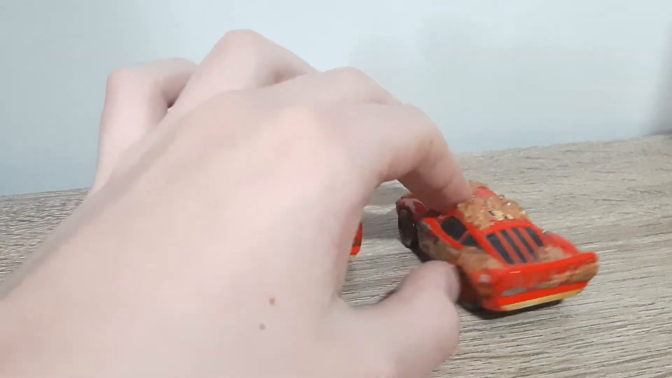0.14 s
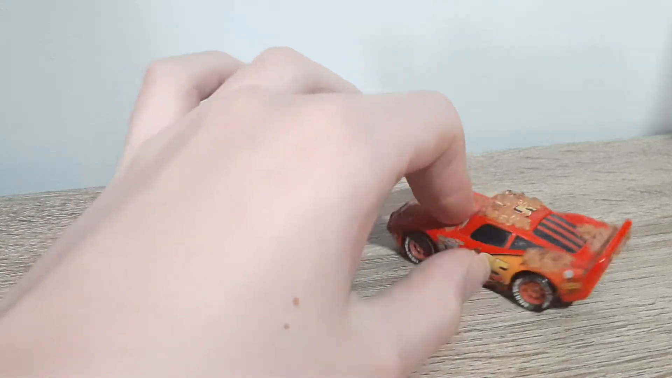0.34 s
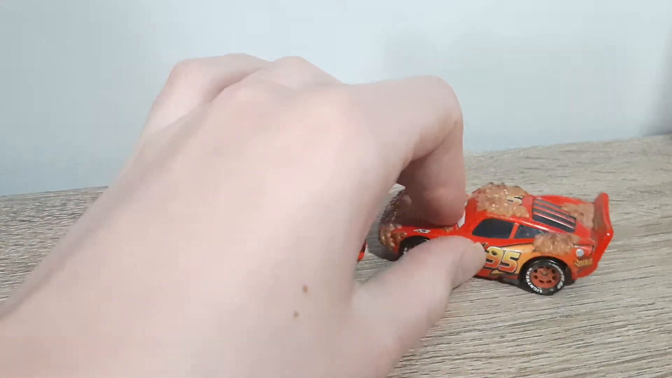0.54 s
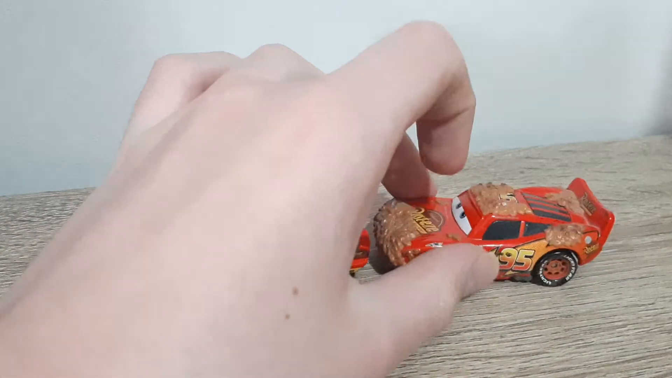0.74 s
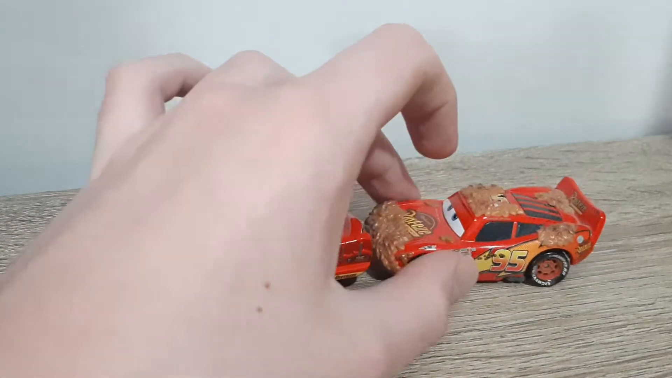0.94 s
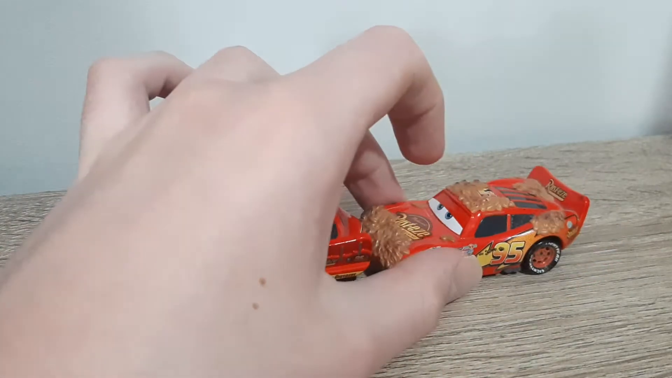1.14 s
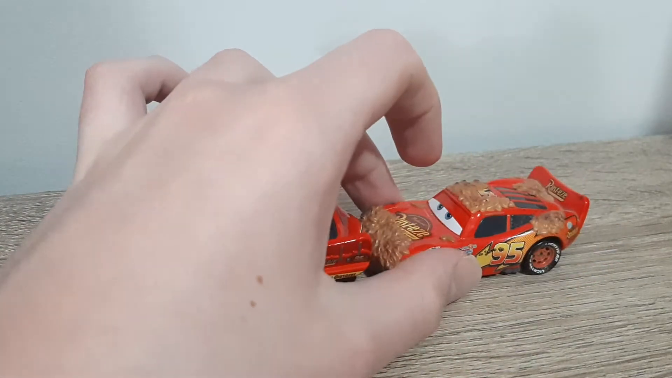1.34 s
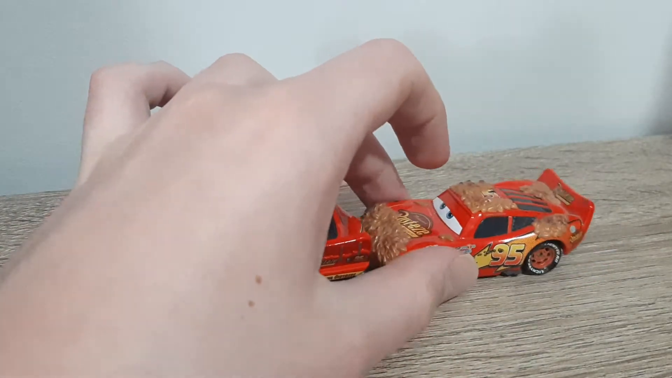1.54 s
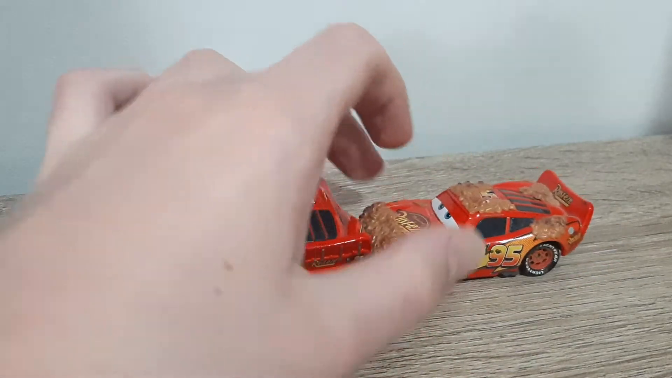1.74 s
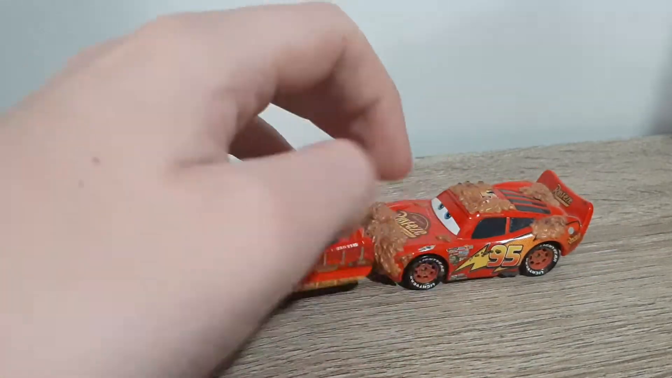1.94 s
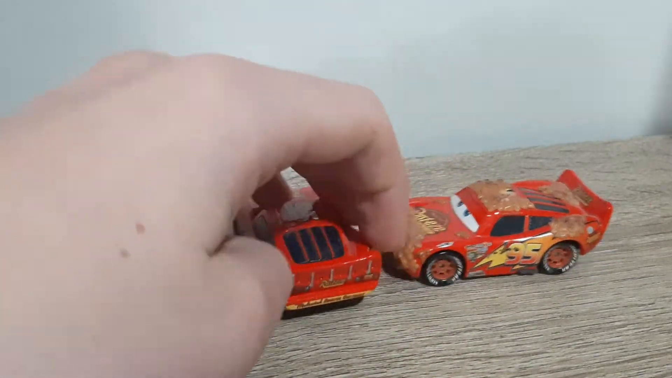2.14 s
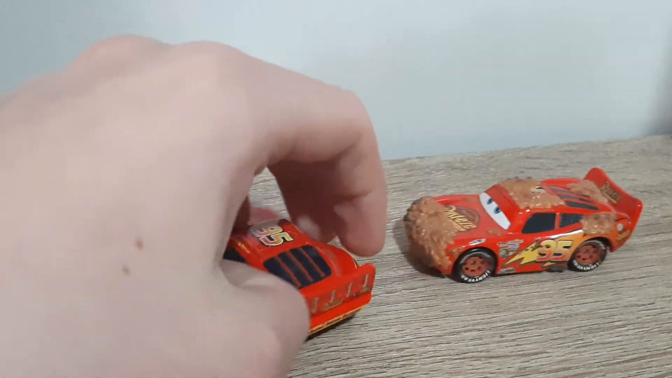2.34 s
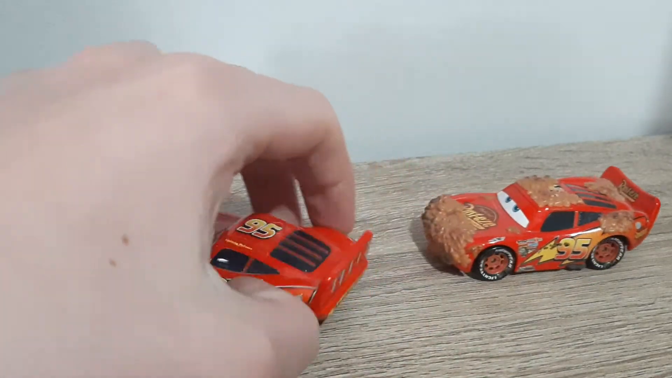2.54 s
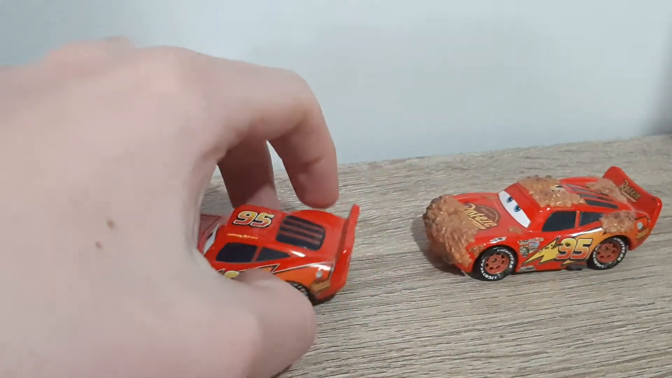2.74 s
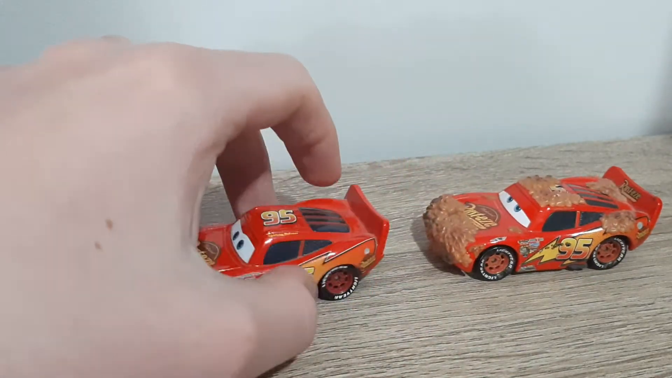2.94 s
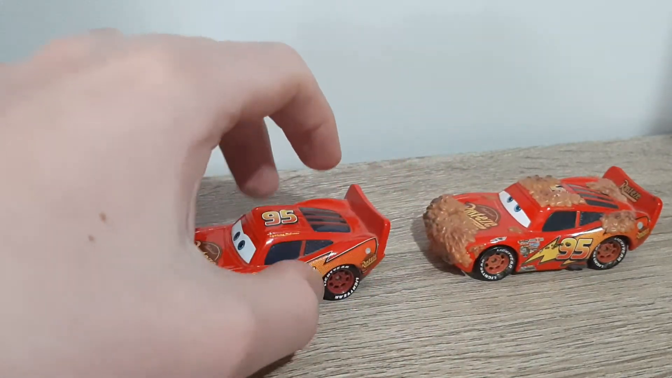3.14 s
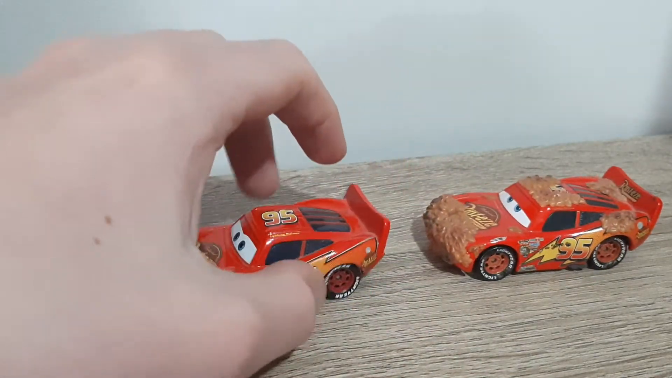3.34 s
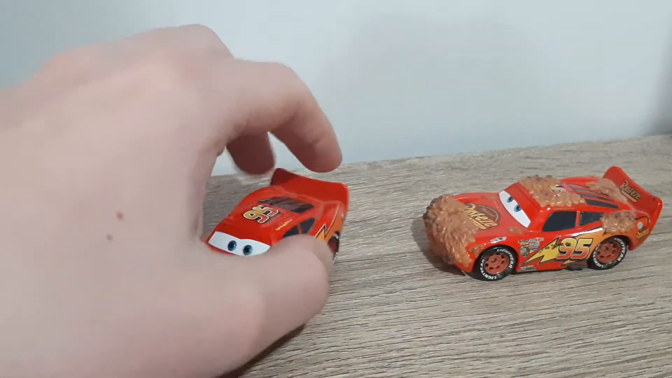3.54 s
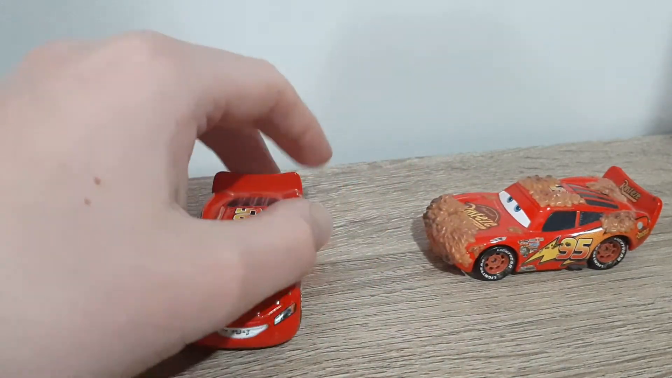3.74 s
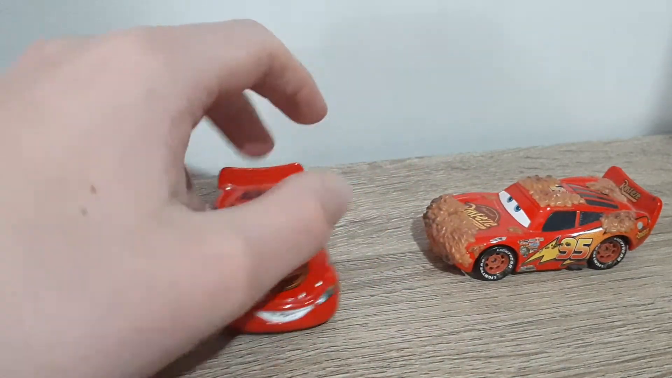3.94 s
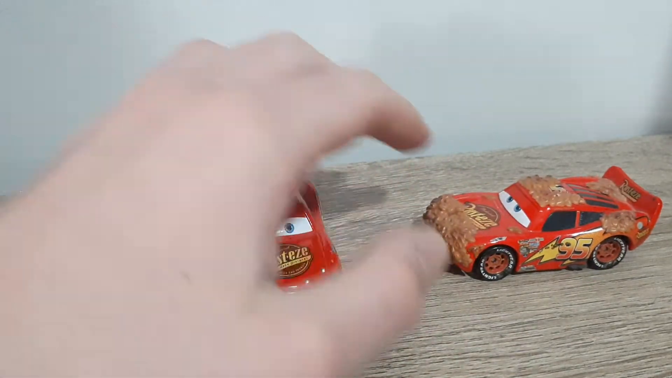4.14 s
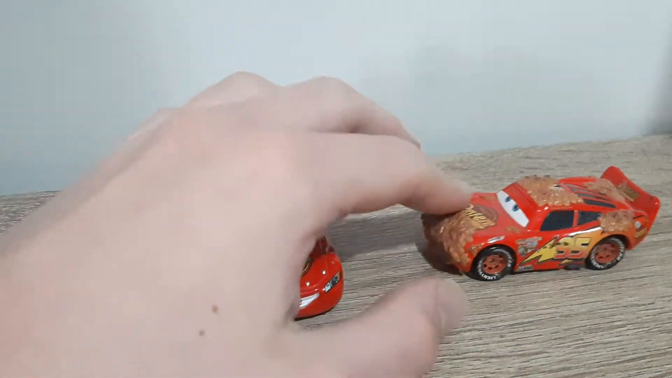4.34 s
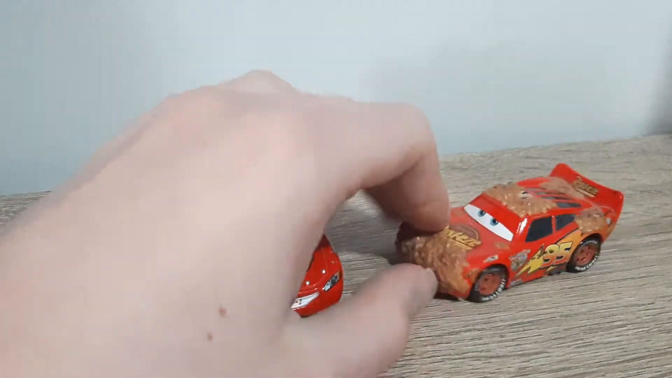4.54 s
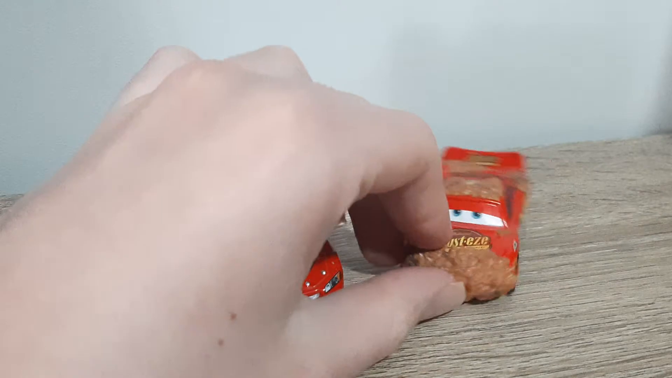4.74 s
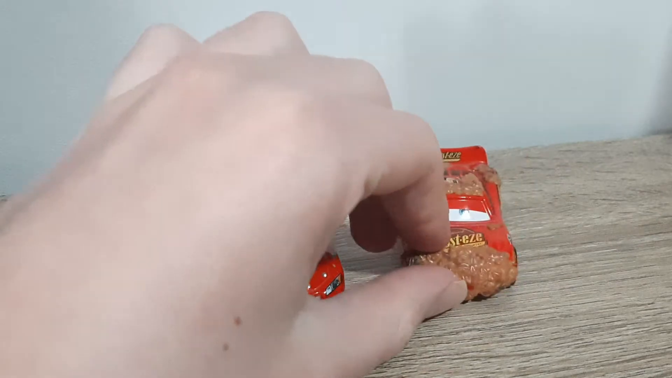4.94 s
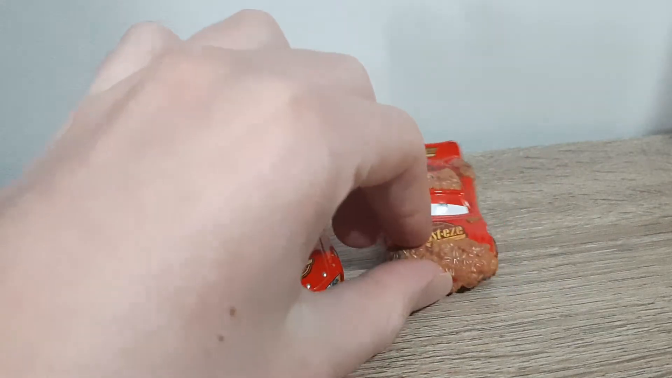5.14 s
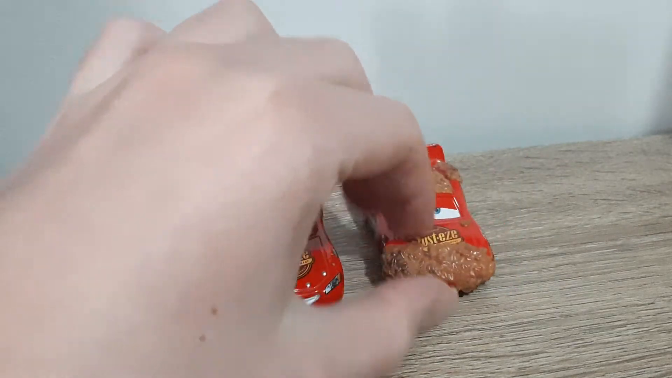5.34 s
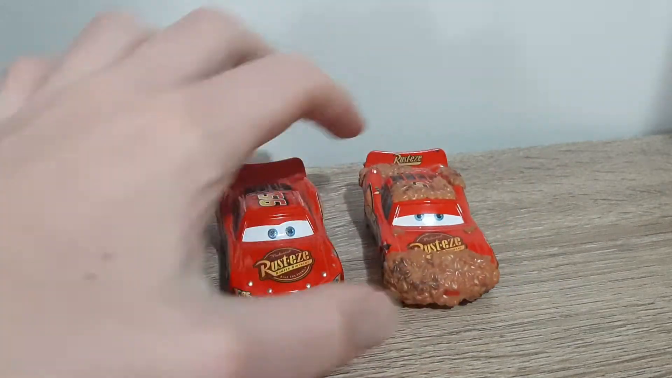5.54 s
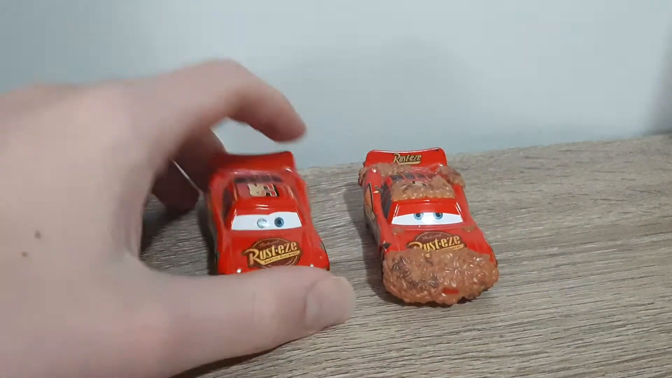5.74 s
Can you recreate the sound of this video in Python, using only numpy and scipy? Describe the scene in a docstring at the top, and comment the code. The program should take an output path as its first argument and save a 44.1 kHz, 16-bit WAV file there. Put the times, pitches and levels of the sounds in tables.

```python
"""Two toy cars are pushed by hand on a hollow wooden tabletop: bumps ring board modes, knocks ring shell modes.
First the muddy car: knocks, tyre scuff (grit and hiss) and a faint squeal (resonant noise), then sparse knocks.
From 1.9 s the plain car: denser shoves and knocks, singing axle tones, a periodic judder; a lull near 3.2 s.
From 4.2 s the muddy car again, clattering over a hollow spot near 4.5 s; from 5.55 s the plain car to the end.
Airborne sound reaches the right microphone first; room echo, and noise as murmur, hum and hiss, lie beneath."""
import sys
import numpy as np
from scipy import signal
from scipy.fft import rfft, irfft, next_fast_len
from scipy.io import wavfile
from scipy.ndimage import uniform_filter1d

SR = 44100
rng = np.random.default_rng(int(sys.argv[2]) if len(sys.argv) > 2 else 0)


def persist_wave(psi):
    """Save psi, clipped to +-1, as 16-bit WAV."""
    counts = np.round(np.clip(psi, -1, 1) * 32767).astype(np.int16)
    wavfile.write(sys.argv[1], SR, np.atleast_2d(counts).T)


N = 254898

# All levels are those ahead of the final mix and microphone.
# hand shoves: start_s, fastest_s, stop_s, scuff_db, fizz_over_scuff_db,
# wheel_load_db, deep_modes_over_load_db, high_modes_over_load_db
SHOVES = [(0.0, 0.001, 0.014, -41.5, -11.5, -38, 12.5, -3.5),
          (0.018, 0.044, 0.11, -50, -11, -28.5, -6, -16.5), (.11, 0.174, 0.33, -45.5, -20, -36, -3.5, -6.5),
          (0.285, 0.357, 0.41, -39.5, -15.5, -37, 3.5, -1), (0.403, 0.419, 0.44, -43, -14, -25, -5, -4.5),
          (0.428, 0.44, 0.49, -47, -14, -51, -7, 0), (0.46, 0.475, 0.64, -67, -9.5, -44, 0.5, -10),
          (0.633, 0.648, 0.77, -47, -14.5, -37, -4, -4), (0.791, 0.792, 0.93, -69.5, -3.5, -55, 3.5, -5.5),
          (1.012, 1.066, 1.2, -66, -10, -44.5, 2, -7.5), (1.082, 1.086, 1.093, -42.5, -19, -46, -1, 12),
          (1.117, 1.156, 1.165, -44.5, -7.5, -38, 1, -3.5), (1.511, 1.518, 1.554, -72, -14, -43.5, -8, -21),
          (1.59, 1.599, 1.71, -70, -4, -66.5, -7, -3.5), (1.72, 1.73, 1.85, -74.5, -2.5, -59.5, 1.5, -12),
          (1.95, 1.962, 2.04, -75.5, -1.5, -43, -4, -22.5),
          (1.997, 1.997, 2.076, -53, -12.5, -36.5, 1, -12), (2.11, 2.185, 2.17, -41, -11, -30, 1.5, -6),
          (2.194, 2.21, 2.3, -38.5, -14, -24, -3.5, -9.5), (2.301, 2.346, 2.39, -33, -11.5, -24, -7.5, -7),
          (2.399, 2.423, 2.485, -47, -22, -38.5, -10.5, -8.5),
          (2.512, 2.535, 2.598, -37, -13, -25.5, -7.5, -7), (2.634, 2.66, 2.77, -47, -15, -34.5, -1, -1),
          (2.77, 2.846, 2.96, -47.5, -19.5, -33.5, -3, -2.5),
          (2.895, 2.932, 2.98, -44.5, -15, -30, -6.5, -18),
          (3.393, 3.421, 3.67, -42, -12.5, -37.5, -4.5, -4), (3.46, 3.49, 3.535, -42.5, -4, -27, -6, -5),
          (3.55, 3.565, 3.79, -65, -18, -31.5, -3.5, -15),
          (3.606, 3.628, 3.74, -40.5, -13, -33.5, 2.5, 1.5), (3.646, 3.664, 3.686, -35, 2.5, -17, -14, -10),
          (3.7, 3.722, 3.75, -66, -16, -24, -14, -25), (3.856, 3.87, 4.094, -65, -27, -37.5, -6.5, -16),
          (3.927, 3.965, 4.025, -35, -8.5, -28.5, -5, -6.5),
          (4.041, 4.052, 4.128, -82.5, -11.5, -40, -10.5, -26.5),
          (4.334, 4.335, 4.45, -67.5, -7, -47, -12, -10.5), (4.435, 4.458, 4.46, -51, -12, -40.5, -5, 2),
          (4.493, 4.53, 4.555, -42.5, -15, -32.5, -2, -2.5),
          (4.585, 4.66, 4.78, -45, -12.5, -37.5, -2, -4.5), (4.683, 4.72, 4.85, -43.5, -7.5, -44.5, -2, -6),
          (4.758, 4.8, 4.84, -36.5, -13, -31, -18.5, -4.5), (4.87, 4.897, 4.93, -58.5, -24, -49.5, 0, -7.5),
          (4.943, 5.015, 5.13, -72, -29, -44.5, -1.5, -7.5), (5.079, 5.098, 5.16, -45, -24, -42.5, -23, -1),
          (5.157, 5.217, 5.29, -40, -17, -39, -6.5, -3.5), (5.354, 5.36, 5.41, -57, -7.5, -35, -3.5, -15.5),
          (5.437, 5.444, 5.62, -69, -3, -59, -18, -8), (5.596, 5.675, 5.69, -55, -8.5, -53.5, 0.5, -10),
          (5.683, 5.723, 5.77, -45, -5.5, -33.5, -3.5, -9)]
# level course of a shove: set_in_db, sag_at_stop_db (both re peak), rise_db_per_s, fall_db_per_s
SCUFF_SHAPE = (-11, -9, 2500, 701)
LOAD_SHAPE = (-5, -8, 899, 448)
HIGH_MODES_SHAPE = (-9.5, -9.5, 1202, 600.5)
FIZZ_SHAPE = (-6.5, -6.5, 2502.5, 403)
LINGER_SHAPE = (-1, -5, 1501.5, 95.5)
# spans with the plain car in hand, else the muddy one: from_s, to_s
PLAIN_CAR = [(1.9, 4.2), (5.55, 5.8)]

# tabletop modes: mode_hz, width_hz, relative_level_db
BOARD_MODES = [(88.9, 150, -26.5), (125.8, 18, -4), (175.3, 23.8, -6), (210, 31, -11), (276, 35.8, -4),
               (302.2, 87, -14.5), (356.4, 5.5, -19), (414, 110, -28.5), (537.3, 43.7, -3.5),
               (628, 70, -10.5), (740, 71, -12), (839, 58, -16), (884, 71, -26.5)]
# hollow spots under a wheel, lifting the top board modes: from_s, to_s, lift_db
HOLLOW_SPOTS = [(4.456, 4.591, 6.5)]
# plain car's tyres stick and slip: pitch_hz, wander_hz, over_load_db, octave_over_pitch_db
JUDDER = (278, 12, -19, -8)
# wheel drops on the wood: start_s, peak_db, pitch_hz
WHEEL_TAPS = [(0.4175, -23.5, 680), (0.789, -38.5, 700), (1.597, -54, 568), (1.608, -54.5, 770),
              (1.724, -56, 846), (3.989, -29, 720), (4.453, -53, 696), (4.481, -41, 760), (4.511, -36, 784),
              (4.5235, -26.5, 700), (4.549, -31, 736), (4.578, -35, 640), (4.768, -29, 566),
              (5.022, -30.5, 325)]
TAP_DECAY_S, TAP_SPREAD_LOG_RATIO = 0.009, 0.45

# axle and shell knocks: start_s, peak_db, pitch_hz,
# then re peak: upper_modes_rms_db, crack_rms_db, board_thump_db
KNOCKS = [(0.0172, -37.5, 1467, -4.5, -6.5, -9), (0.0575, -41, 1480, -5, -17, -19),
          (0.1039, -39.5, 1930, -15, -18, 15), (0.1158, -28, 1914, -17, -25, -17),
          (0.2262, -38, 2050, -9, -12, -4), (0.2955, -42.5, 2000, -7, -22, 10),
          (0.3095, -35.5, 2010, -19, -19, -1), (0.332, -33.5, 1270, -5.5, -10, -2),
          (0.3521, -30, 1980, -9, -8.5, -6), (0.4175, -28.5, 1210, -25, -29, 1.5),
          (0.441, -29, 2090, -12.5, -26, -8), (0.645, -38.5, 2010, -41, -38, 8.5),
          (0.6558, -37, 1850, -17, -19, -15), (0.683, -41, 1950, -10, -3.5, 2),
          (0.7217, -26, 2040, -18, -25, -6), (0.789, -46, 1730, -40, -32, 6.5),
          (0.943, -66.5, 4880, -5, 7, 11), (1.017, -68.5, 2120, -3, 10, -5),
          (1.057, -56, 2010, -15, -12, 10), (1.0827, -39, 2260, -7, -10, -3),
          (1.0955, -26, 2200, -6, -5.5, -10), (1.1361, -35, 2020, -13, -20, 0),
          (1.509, -59, 1950, -18, -22, 11.5), (1.594, -48.5, 2030, -7, -18, 0),
          (1.726, -49.5, 2010, -13.5, -15, 5.5), (1.9973, -34.5, 1980, -17, -23, 8),
          (2.117, -40, 6040, 2, -5, 15), (2.1293, -39, 1620, -27, -7, -4),
          (2.1474, -35.5, 1890, -20, -6, 9), (2.162, -24, 1256, -14.5, -12, 0.5),
          (2.2075, -36.5, 2040, -8, -2, 14), (2.2445, -22.5, 2350, -9, -12.5, -3),
          (2.283, -25, 2430, -14, -17, 3.5), (2.316, -25.5, 2020, -8, -13, 10),
          (2.3323, -26, 1970, -12, -30, 0), (2.3787, -31, 6000, -3, -13, 10),
          (2.4391, -36, 2550, -10, -19, -20), (2.497, -36, 6000, 0, -23, -24),
          (2.5172, -29, 1940, -8, -13.5, -4), (2.5426, -28, 2163, -11, -11, 7),
          (2.5797, -30.5, 1990, -16, -31, 4), (2.643, -31.5, 3690, -19, -15, 1.5),
          (2.702, -36, 2620, -22, -28, -4), (2.817, -33.5, 3650, -14, -22, 5.5),
          (2.8802, -30.5, 2500, -34, -17, -2), (2.9203, -26.5, 2500, -27, -37, 7),
          (2.931, -27, 2880, -16, -15.5, 3), (2.972, -30.5, 2160, -19, -20, -1.5),
          (3.3869, -33.5, 5500, -1.5, -10, -11.5), (3.464, -38.5, 2020, -14, -12, 7),
          (3.546, -38, 3640, -9, -13, 0), (3.6215, -29.5, 1970, -4, -2, -13),
          (3.861, -45.5, 1250, -22, -27, 18), (3.925, -57.5, 2400, -5.5, 7, -2),
          (3.9514, -33.5, 4100, -10.5, -25, -4), (3.9586, -29.5, 2470, -18, -27, 5.5),
          (3.989, -25.5, 1668, -9, -13, -2), (4.0203, -32.5, 1260, -20, -10, 10.5),
          (4.3405, -57, 2550, -7, -6, 12), (4.35, -48.5, 2000, -13.5, -3, 4),
          (4.4394, -46, 1930, -7, -22, -2), (4.4517, -45, 5850, -2, -6, 13),
          (4.4794, -33.5, 2140, -16, -17, 7.5), (4.5229, -34.5, 1540, -35, -29, 2.5),
          (4.5495, -36, 1230, -20, -18, 8), (4.58, -42, 1990, -11, -20, 6),
          (4.6017, -43, 2060, -1, -4, -19), (4.6912, -37, 1620, -1.5, -0.5, 4),
          (4.7182, -26, 2540, -10.5, -9, -20), (4.7449, -23, 2076, -11.5, -10, -6),
          (4.7649, -25.5, 1800, -13, -12, 2), (4.7953, -34, 1880, -11, -1, 5),
          (4.8186, -31.5, 2730, -5.5, 2, -9), (4.899, -52, 2000, -18, -21, -3),
          (5.0225, -47.5, 2530, -12, -19, 11), (5.0634, -41.5, 2130, -21, -27, 6.5),
          (5.0915, -36, 3060, -35, -40, 0), (5.1482, -41.5, 1810, -9, -15, -3),
          (5.1594, -31, 1994, -16, -26, -9), (5.1881, -30, 1920, -8.5, -7.5, -4.5),
          (5.222, -26, 3213, -14.5, -24, -18), (5.2617, -41, 5700, -1.5, -9, -3),
          (5.2727, -38, 1530, -2, -5, -4), (5.2848, -38.5, 2027, -6, -15, 1.5),
          (5.3455, -43, 4770, 0, -27, -2), (5.3572, -39, 1980, -34, -9, 13),
          (5.448, -59.5, 3188, -1, 4, 13), (5.4641, -52.5, 1956, -6, 6, 13),
          (5.6296, -38.5, 2460, -15, -25, -15), (5.6971, -29, 2230, -24, -30, 4.5),
          (5.7198, -37, 2080, -6.5, -8.5, 15), (5.7552, -35.5, 4454, 0.5, -4, -6)]
# car shell modes: mode_hz, width_hz, plain_car_level_db, muddy_car_level_db
SHELL_MODES = [(1065, 72, -33.5, -11), (1214, 180, -2.5, -1.5), (1613, 130, -1.5, -1.5),
               (1743, 72, 1, -1.5), (2004, 134, 2.5, -1), (2384, 51, 0, -5.5), (2622, 150, -3, -4),
               (3230, 213, -1, -2.5), (3680, 170, -2, -6), (4225, 140, -9.5, -16),
               (4830, 430, -19.5, -17.5), (5480, 200, -16, -15), (6000, 190, -10, -11),
               (7580, 160, -17.5, -23)]
STRIKE_SIZE = 3.63  # first clean strike, re the rattling contact noise
CREST_DB = 6  # assumed peak over rms of a knock part

# tyre hiss spectrum: freq_hz, relative_density_db
SCUFF_SPECTRUM = [(530, -27), (900, 0), (1960, 0.5), (3860, -6.5), (4200, -5), (7240, -8.5), (9460, -14.5),
                  (11500, -12), (15000, -13.5), (16300, -46)]
SHELL_DRIFT_DB, CONTACT_FLUTTER_DB = 4, 4.4
LINGER_OVER_FIZZ_DB = -27
# shell tones of a dragging axle: from_s, to_s, pitch_hz, over_scuff_db
SINGING = [(1.135, 1.258, 1990, -3.5), (1.584, 1.658, 3050, -8), (1.72, 1.814, 1970, -5),
           (2.002, 2.1, 1980, -2.5), (2.205, 2.45, 6000, -13), (2.28, 2.38, 2370, -6.5),
           (2.322, 2.387, 1974, -3.5), (2.635, 2.72, 4250, -11), (2.634, 2.757, 3680, -7.5),
           (2.79, 2.873, 3600, -5), (2.79, 2.823, 4260, -14), (3.41, 3.561, 3670, -2.5),
           (3.62, 3.704, 4160, -3), (3.62, 3.696, 5970, -8.5), (4.7, 4.848, 1150, -16),
           (5.27, 5.296, 5700, -11)]
SINGING_WIDTH_HZ = 110
# tyre squeal: time_s, pitch_hz, level_db
SQUEAL = [(0.11, 10660, -100), (0.16, 10750, -72), (0.27, 11100, -73), (0.34, 11400, -70.5),
          (0.43, 11400, -76), (0.5, 11200, -100)]
SQUEAL_WIDTH_HZ = 500

# room decay: freq_hz, t60_s
ROOM_DECAY = [(200, 0.23), (800, 0.16), (3000, 0.14), (12000, 0.048)]
# left re right channel: freq_hz, level_difference_db
LEFT_SHADE = [(100, 1.5), (500, -3), (1100, 2), (2200, 0.5), (4500, -4), (12000, -9)]
AIR_LEFT_LAG_SAMPLES, BOARD_LEFT_LAG_SAMPLES = 19, 9
GRAIN_SHARE, HISS_SHARE = 0.63, 0.26  # part of the noise common to both channels

# low hum: time_s, level_db
HUM_LEVEL = [(0, -57), (1.2, -65.5), (2.8, -61), (3.3, -77.5), (5.3, -74.5), (5.78, -57)]
# hum band: centre_hz, half_width_at_minus_6_db_hz
HUM_BAND = (52, 5.9)
# building murmur spectrum, ahead of a further tilt: freq_hz, relative_density_db
MURMUR_SPECTRUM = [(18, -33.5), (30, -7.5), (56, -9.5), (70, -15), (84, -7.5), (105, -4.5), (128, -15.5),
                   (246, -13), (286, -1.5), (325, -38.5), (600, -41), (780, -70), (1320, -120)]
# microphone hiss spectrum: freq_hz, relative_density_db
HISS_SPECTRUM = [(300, 6.5), (1000, -5), (3000, -9), (7000, -13), (11000, -12.5), (15000, -0.5),
                 (16500, -3.5)]
MURMUR_DB, HISS_DB = -59, -75
# microphone treble dip: centre_hz, full_width_at_1_over_e_hz, depth_db
MIC_DIP = (9160, 1200, 8.9)
BAND_EDGE_HZ = 16000


def board(blows):
    """Wheels bump over the grain and ring the tabletop; each mode's drive varies as they travel."""
    load, deep, high = np.transpose(SHOVES)[5:]
    load_db = shoved(load, LOAD_SHAPE)
    deep_db = shoved(load + deep, LOAD_SHAPE) - load_db
    high_db = shoved(load + high, HIGH_MODES_SHAPE) - load_db
    grain = bumps(per_s=900, spread_db=2.0) * lumps(ms=29.0, depth_db=-0.95)
    force = gain_of(load_db) * grain + blows + judder(load_db)

    t = np.arange(N) / SR
    hollow_db = sum(db * ((t > start) & (t < end)) for start, end, db in HOLLOW_SPOTS)

    def group_db(hz):
        """Drive of the mode group that holds hz, re the wheel load."""
        if hz < 190:
            return deep_db
        if hz < 450:
            return 0
        return high_db if hz < 680 else high_db + hollow_db

    weights = [gain_of(db + group_db(hz)) * lumps(ms=34, depth_db=1.8) for hz, _, db in BOARD_MODES]
    modes = np.array(ring_all(force, BOARD_MODES, weights, size=8000))[:, 0]
    is_high = np.transpose(BOARD_MODES)[0] > 450
    # a free-edged board sends out no deep bass; soft tyres drive little treble
    free_edge = signal.butter(4, 75., "high", fs=SR, output="sos")
    soft_tyre = signal.butter(4, 1100, fs=SR, output="sos")
    low = signal.sosfilt(free_edge, modes[~is_high].sum(0))
    top = signal.sosfilt(soft_tyre, modes[is_high].sum(0) + wheel_taps())
    # short bending waves reach the left side later
    pair = np.array([delayed(top, BOARD_LEFT_LAG_SAMPLES), top])
    return low + gain_of(-20.0) * room(low) + pair + gain_of(-10.5) * room(top)


def judder(load_db):
    """Stick-slip of the plain car's tyres: a wandering periodic tug that scales with wheel load."""
    hz, wander_hz, db, octave_db = JUDDER
    wander = evened(uniform_filter1d(rng.standard_normal(N), size=900))
    phase = 2 * np.pi * np.cumsum(hz + wander_hz * wander) / SR
    tug = np.sin(phase) + gain_of(octave_db) * np.sin(2 * phase)
    return plain_in_hand(np.arange(N) / SR) * gain_of(load_db + db) * tug


def wheel_taps():
    """A dropped wheel rings board modes near its pitch; the pressing hand damps them."""
    out, tones = np.zeros(N), rings(BOARD_MODES, size=2500)
    mode_hz, _, mode_db = np.transpose(BOARD_MODES)
    damping = np.exp(-np.arange(tones.shape[1]) / SR / TAP_DECAY_S)
    for s, db, hz in WHEEL_TAPS:
        struck = gain_of(mode_db) * np.exp(-(np.log(mode_hz / hz) / TAP_SPREAD_LOG_RATIO) ** 2)
        add(out, s, peaked(struck @ tones * damping, db))
    return out


def knocks():
    """A strike and a few ms of rattling contact ring the shell, crack, and thump the board."""
    force, air = np.zeros(N), np.zeros((N, 2))
    shell, mode_hz = rings(SHELL_MODES, size=1500), np.transpose(SHELL_MODES)[0]
    t = np.arange(700) / SR
    contact = (1 - np.exp(-t / 0.0007)) * np.exp(-t / 0.0028)
    strike = STRIKE_SIZE * (np.arange(len(t)) == 20)
    upper = mode_hz > 4000
    draws = rng.standard_normal((len(KNOCKS), 4, len(t)))
    for knock, (a, b, c, d) in zip(KNOCKS, draws):
        s, db, hz, upper_db, crack_db, thump_db = knock
        near_pitch = np.exp(-(np.log(mode_hz / hz) / 0.04) ** 2)
        struck = (0.33 + 1.4 * near_pitch) * gain_of(shell_db(s))
        rattle = paired(a, b) * contact + strike
        for part, part_db in ((~upper, 0), (upper, upper_db + CREST_DB)):
            ring = signal.fftconvolve(rattle, [struck[part] @ shell[part]], axes=1)
            add(air, s, peaked(ring, db + part_db))
        crack = np.diff(paired(c, d, HISS_SHARE), prepend=0) * contact
        add(air, s, peaked(crack, db + crack_db + CREST_DB))
        add(force, s, gain_of(db + thump_db) * np.hanning(30))
    return force, air.T


def scuffing():
    """Grit under the tyres hisses and sets the shell chattering."""
    scuff, bright = np.transpose(SHOVES)[3:5]
    scuff_db = shoved(scuff, SCUFF_SHAPE)
    fizz_db = shoved(scuff + bright, FIZZ_SHAPE)
    linger_db = shoved(scuff + bright + LINGER_OVER_FIZZ_DB, LINGER_SHAPE)
    t, contact = np.arange(N) / SR, lumps(ms=4.8, depth_db=CONTACT_FLUTTER_DB)

    grains = paired(bumps(per_s=3200, spread_db=0.0), bumps(per_s=3000, spread_db=4.5))
    grit = gain_of(scuff_db - 5) * contact * grains
    weights = [gain_of(db) * lumps(ms=30.0, depth_db=SHELL_DRIFT_DB) for db in shell_db(t)]
    chatter = sum(ring_all(grit, SHELL_MODES, weights, size=1500))

    noise = paired(*rng.standard_normal((2, N)), HISS_SHARE)
    hiss = evened(coloured(noise, lambda hz: read(SCUFF_SPECTRUM, hz))) * contact
    low = signal.sosfilt(signal.butter(2, 4800, fs=SR, output="sos"), hiss)
    treble = hiss - low
    fizz = gain_of(fizz_db) * evened(treble)
    linger = gain_of(linger_db) * evened(treble / contact)  # contact flutter divided out
    return chatter + gain_of(scuff_db - 11) * low + fizz + linger + singing(scuff_db)


def singing(scuff_db):
    """Fitful rattling of a dragging axle keeps single narrow shell tones ringing."""
    out = np.zeros((2, N))
    rattle = paired(bumps(per_s=600, spread_db=5.0), bumps(per_s=830, spread_db=3.0))
    rattle = rattle * lumps(ms=10.0, depth_db=3.5)
    for start, end, hz, db in SINGING:
        span = slice(round(start * SR), round(end * SR))
        tone = rings([(hz, SINGING_WIDTH_HZ)], size=1500)
        drive = gain_of(scuff_db[span] + db) * rattle[:, span]
        add(out.T, start, signal.fftconvolve(drive, tone / np.linalg.norm(tone), axes=1).T)
    return out


def squeal():
    """Tyre squeal: noise in one wide resonance that follows the pitch curve."""
    hz, db = curves([SQUEAL])
    noise = paired(*rng.standard_normal((2, N)))
    return gain_of(db) * evened(resonate(noise, hz, SQUEAL_WIDTH_HZ))


def room(x):
    """Room echo: sparse taps of random sign, each band dying at its own rate."""
    echoes = np.zeros((2, SR // 2))
    slots = np.arange(100, SR // 2 - 20, 20)
    at = slots + rng.integers(0, 20, (2, len(slots)))
    np.put_along_axis(echoes, at, rng.choice([-1., 1.], at.shape), 1)
    hz, t, z = signal.stft(echoes, SR, nperseg=256)
    decay = gain_of(-60 * t / read(ROOM_DECAY, hz)[:, None])
    tail = signal.istft(z * decay, SR, nperseg=256)[1]
    return signal.fftconvolve(x[None], tail / np.linalg.norm(tail[0]), axes=1)[:, :N]


def hum():
    """Narrow noise around a low pitch, its level wavering."""
    centre_hz, width_hz = HUM_BAND
    band = coloured(rng.standard_normal(N),
                    lambda hz: np.maximum(-6 * ((hz - centre_hz) / width_hz) ** 2, -90))
    return gain_of(curves([HUM_LEVEL])[0]) * evened(band)


def hush():
    """Building murmur nearly alike at both microphones, plus each one's own hiss."""
    a, b, c, d = rng.standard_normal((4, N))
    murmur = coloured(np.array([a + 0.15 * b, a - 0.11 * b]),
                      lambda hz: read(MURMUR_SPECTRUM, hz) - hz / 40)
    hiss = coloured(np.array([c, d]), lambda hz: read(HISS_SPECTRUM, hz))
    return gain_of(MURMUR_DB) * evened(murmur) + gain_of(HISS_DB) * evened(hiss)


def shoved(levels_db, shape):
    """Level in dB of all shoves: set-in, swell, sag, decay; overlaps add in power."""
    set_in_db, sag_db, rise, fall = shape
    t, power = np.arange(0, N, 32) / SR, 1e-14
    for (start, fastest, stop, *_), db in zip(SHOVES, levels_db):
        swell_db = np.interp(t, [start, fastest, stop], [set_in_db, 0, sag_db])
        edge_db = rise * np.maximum(start - t, 0) + fall * np.maximum(t - stop, 0)
        power = power + gain_of(db + swell_db - edge_db) ** 2
    return np.interp(np.arange(N) / SR, t, 10 * np.log10(power))


def plain_in_hand(t):
    """Nonzero while the plain car is in hand."""
    return sum((t > a) & (t < b) for a, b in PLAIN_CAR)


def shell_db(t):
    """Level of each shell mode at times t, for the car then in hand."""
    plain = plain_in_hand(t)
    return np.array([np.where(plain, plain_db, muddy_db) for _, _, plain_db, muddy_db in SHELL_MODES])


def rings(modes, size):
    """One dying sine a mode; neighbours swing in opposite sense."""
    t = np.arange(size) / SR
    return np.array([(-1) ** k * width * np.exp(-np.pi * width * t) * np.sin(2 * np.pi * hz * t)
                     for k, (hz, width, *_) in enumerate(modes)])


def ring_all(drive, modes, weights, size):
    """Feeds the drive into each mode through its own time-varying weight."""
    tones = rings(modes, size=size)
    tones = tones / np.linalg.norm(gain_of([m[-1] for m in modes]) @ tones)
    return [signal.oaconvolve(np.atleast_2d(drive * w), tone[None], axes=1)[:, :N]
            for w, tone in zip(weights, tones)]


def resonate(x, hz, width_hz):
    """Moving resonance: shifts hz down to zero, smooths twice, shifts back."""
    turn = np.exp(2j * np.pi * np.cumsum(hz * np.ones(N)) / SR)
    r = np.exp(-np.pi * width_hz / SR)
    return (turn * signal.lfilter([(1 - r) ** 2], [1, -2 * r, r ** 2], x / turn)).real


def bumps(per_s, spread_db):
    """Sparse impulses of random sign and, with spread, uneven size."""
    size = gain_of(spread_db * np.minimum(rng.exponential(1, N), 4)) * rng.choice([-1., 1.], N)
    return evened(size * (rng.random(N) < per_s / SR))


def lumps(ms, depth_db):
    """Uneven contact: a bounded gain flutter on a scale of ms."""
    span = round(ms * SR / 1000)
    slow = uniform_filter1d(uniform_filter1d(rng.standard_normal(N), span), span)
    return evened(gain_of(depth_db * 2 * np.tanh(evened(slow) / 2)))


def paired(a, b, share=GRAIN_SHARE):
    """Left and right face different wheels: part of the noise is their own."""
    same = np.clip(share, 0, 1)
    return np.array([same * a + np.sqrt(1 - same ** 2) * b, a])


def coloured(x, db_of_hz):
    """Filters by a gain in dB over frequency."""
    size = next_fast_len(x.shape[-1] + 2048)
    gain = gain_of(db_of_hz(np.fft.rfftfreq(size, 1 / SR)))
    return irfft(rfft(x, size) * gain, size)[..., :x.shape[-1]]


def read(points, hz):
    """Reads a table on a log-frequency axis."""
    f, value = np.transpose(points)
    return np.interp(np.log(hz + 1), np.log(f + 1), value)


def curves(tables):
    """Joins the tables and reads each column at every sample."""
    s, *columns = np.concatenate(tables).T
    return [np.interp(np.arange(N) / SR, s, c) for c in columns]


def gain_of(db):
    """Decibels to gain."""
    return 10 ** (np.asarray(db) / 20)


def evened(x):
    """Scales to rms 1."""
    return x / np.sqrt(np.mean(x ** 2) + 1e-20)


def peaked(x, db):
    """Scales to a peak level, channels last."""
    return gain_of(db) * x.T / abs(x).max()


def delayed(x, samples):
    """Delays by whole samples."""
    return np.concatenate([np.zeros(samples), x])[:N]


def add(mix, s, sound):
    """Mixes a sound in at s seconds."""
    part = mix[round(s * SR):][:len(sound)]
    part += sound[:len(part)]


def scene():
    """Board drum near the middle, airborne sound from the right, room and background."""
    blows, ticks = knocks()
    air = scuffing() + squeal() + ticks
    direct = np.array([delayed(air[0], AIR_LEFT_LAG_SAMPLES), air[1]])
    pair = gain_of(1.5) * direct + gain_of(-8.0) * room(air[1]) + board(blows)
    left = coloured(pair[0], lambda hz: read(LEFT_SHADE, hz) / 2)
    right = coloured(pair[1], lambda hz: -read(LEFT_SHADE, hz) / 2)
    return np.array([left, right]) + hush() + hum()


def record(dry):
    """Microphone treble dip and deep-bass cut, then the band limit."""
    dip_hz, width_hz, depth_db = MIC_DIP
    heard = coloured(dry, lambda hz: -depth_db * np.exp(-((hz - dip_hz) / width_hz * 2) ** 2))
    heard = signal.sosfilt(signal.butter(6, 43, "high", fs=SR, output="sos"), heard)
    band_limit = signal.firwin(511, BAND_EDGE_HZ, window=("kaiser", 9), fs=SR)
    return signal.oaconvolve(heard, band_limit[None], "same")


dry = scene()
out = record(dry)
persist_wave(out)
```